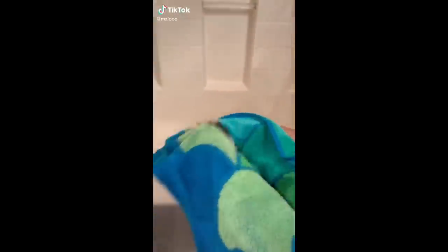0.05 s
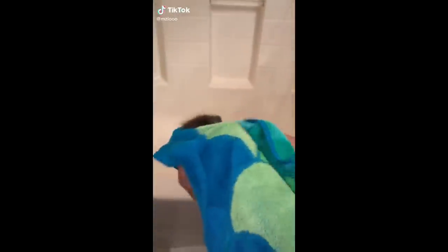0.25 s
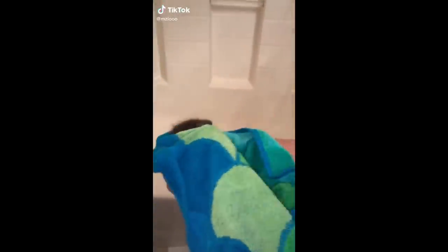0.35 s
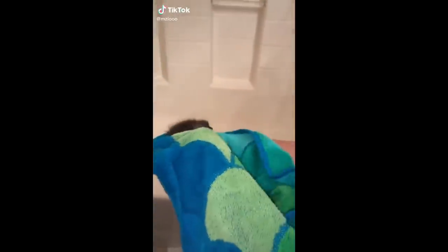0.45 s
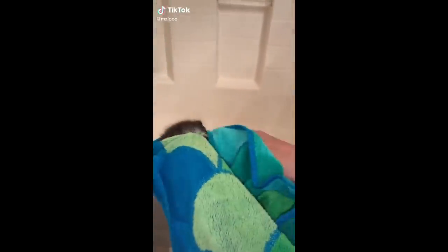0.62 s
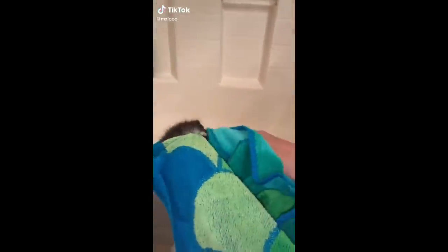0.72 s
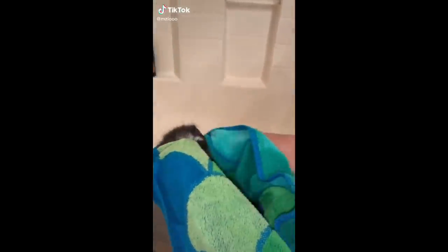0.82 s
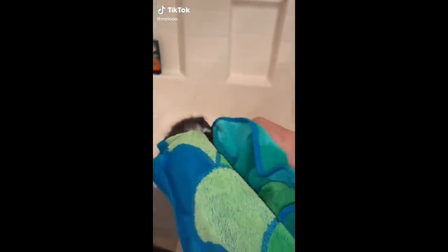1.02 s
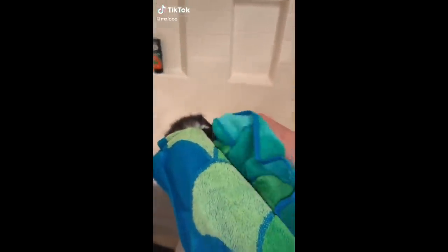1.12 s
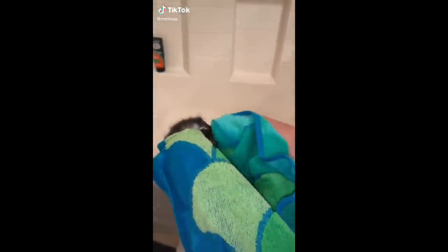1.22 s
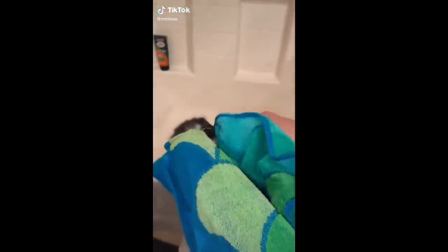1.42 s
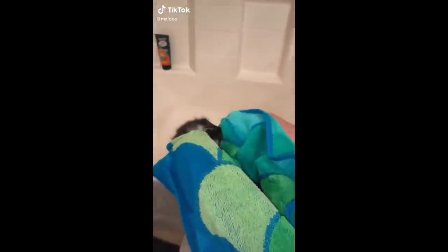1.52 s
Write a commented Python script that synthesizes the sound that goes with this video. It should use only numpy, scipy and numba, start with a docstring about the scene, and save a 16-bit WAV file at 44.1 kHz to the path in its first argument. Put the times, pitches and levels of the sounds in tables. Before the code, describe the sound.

A young raccoon cries out twice, close up: a creaky rasp narrowing to a wavering squeal, then a long fluttering snarl. Towel rubbing and dull bumps lie beneath, in a small, hard, ringing bathroom.

```python
"""A young raccoon protests while it is rubbed dry in a towel over a bathtub.
Uneven throat pulses and puffs of noise, shaped by resonances, make its voice. The first cry creaks open
into a harsh rasp and narrows to a rough squeal, a wavering tone; the second is a long, fluttering snarl.
Coloured noise makes the towel's rubbing, and short low tones its dull bumps.
The small hard room rings behind a close pair of microphones."""
import sys
import numpy as np
from scipy import signal
from scipy.fft import rfft, irfft, next_fast_len
from scipy.io import wavfile
from scipy.ndimage import uniform_filter1d
from numba import njit

SR = 44100
rng = np.random.default_rng(int(sys.argv[2]) if len(sys.argv) > 2 else 0)


def master(y):
    """Save y as 16-bit WAV."""
    cut = np.clip(np.atleast_2d(y).T, -1, 1)
    pcm = np.round(cut * 32767)  # scale
    wavfile.write(sys.argv[1], SR, pcm.astype(np.int16))


N = 68355
TIME = np.arange(N) / SR


def from_db(db):
    """Turns decibels into a plain amplitude factor."""
    return 10 ** (np.asarray(db) / 20)


def rms_one(x):
    """Scales a sound to an average strength (rms) of 1."""
    return x / np.sqrt(np.mean(x ** 2) + 1e-20)


def in_time(rows):
    """Draws each column of a table as a curve, sample by sample."""
    s, *columns = np.transpose(rows)
    return [np.interp(TIME, s, c) for c in columns]


def during(rows, fade_s):
    """One while a table's curve lasts, fading to zero outside it."""
    inside_s = np.minimum(TIME - rows[0][0], rows[-1][0] - TIME)
    return np.clip(inside_s / fade_s + 1, 0, 1)


def white_noise():
    """A fresh stretch of plain noise, equally strong at every pitch."""
    return rng.standard_normal(N)


def drift(rate_hz):
    """Slow random wandering with spread 1: noise smoothed twice."""
    r = np.exp(-2 * np.pi * rate_hz / SR)
    wander = signal.lfilter([1], [1, -2 * r, r * r], rng.standard_normal(2 * N))
    return rms_one(wander[N:])  # the first half only settles the filter


def coloured(spectrum):
    """Noise with a given balance of low and high, rms 1."""
    hz, db = np.transpose(spectrum)
    bins = np.linspace(1, SR / 2, N // 2 + 1)
    colour = from_db(np.interp(np.log(bins), np.log(hz), db))
    return rms_one(irfft(rfft(white_noise()) * colour, N))


def evened(x, window_s):
    """Holds the running rms near 1 and leaves faster grain alone."""
    size = max(int(window_s * SR), 2)
    power = uniform_filter1d(uniform_filter1d(x * x, size), size)
    return x / np.sqrt(np.abs(power) + 1e-12)


@njit
def resonate(x, angle, r):
    """A movable resonance that rings at one pitch, with gain close to 1 at its top."""
    y = np.zeros(len(x))
    for i in range(2, len(x)):
        fed = (1 - r * r) / 2 * (x[i] - x[i - 2])
        y[i] = fed + 2 * r * np.cos(angle[i]) * y[i - 1] - r * r * y[i - 2]
    return y


def cavity(source, table, shift=1):
    """Side-by-side resonances, each run twice to steepen it and fed by its own call of the source."""
    out = 0
    for hz, width, db in table:
        angle = 2 * np.pi * hz * shift / SR * np.ones(N)
        r = np.exp(-np.pi * width / SR)
        out = out + from_db(db) * resonate(resonate(source(), angle, r), angle, r)
    return out


def larynx(pitch_hz, jitter, shimmer_db, puff_s, leak, limp_db=0):
    """Uneven throat pulses that let out puffs of noise; returns a source for any noise share (0-1)."""
    cycles = np.floor(np.cumsum(pitch_hz * np.exp(jitter * drift(120))) / SR)
    # a limp makes every other pulse stronger
    strength_db = shimmer_db * drift(93) + limp_db * (cycles % 2)
    pulses = np.diff(cycles, prepend=0) * from_db(strength_db)
    decay = np.exp(-1 / (puff_s * SR))
    puffs = rms_one(signal.lfilter([1], [1, -decay], pulses + 1e-18)) + leak

    def source(rough):
        breath = rms_one(puffs * white_noise())
        return np.sqrt(1 - rough) * rms_one(pulses) + np.sqrt(rough) * breath
    return source


# towel rubbing: start_s, level_db (wavers around this)
RUB_LEVEL = [(0, -40.5), (.04, -46.5), (.075, -39), (.1, -43), (.125, -51.5), (.18, -62), (.25, -39),
             (1.0, -38.5), (1.3, -55), (1.55, -67.5)]
# its colour, low to high: pitch_hz, level_db per Hz (relative)
RUB_COLOUR = [(100, -47), (220, 1.5), (420, 2.5), (700, -2), (1300, 2.5), (2000, 7), (2800, -5),
              (4000, -19), (7000, -21), (15000, -45.5)]


def rubbing():
    """Cloth rubbing: coloured noise with a quick random waver that gives it grain."""
    level_db = in_time(RUB_LEVEL)[0] + 1.54 * drift(160)
    return from_db(level_db) * coloured(RUB_COLOUR)


# murmur of the tub under the handling: start_s, level_db
HOLLOW_LEVEL = [(0, -65), (.17, -55), (.22, -33.5), (.4, -45.5), (.75, -54), (1.0, -55), (1.2, -81),
                (1.55, -57.5)]
# resonances of the tub: pitch_hz, width_hz (of each pass), level_db (relative)
TUB_RESONANCES = [(244, 80, 1.5), (328, 87, 4.5), (441, 180, -1.5)]


def hollow_tub():
    """The tub's hollow answer: noise ringing in a few low resonances."""
    murmur = evened(cavity(white_noise, TUB_RESONANCES), window_s=0.3)
    return from_db(in_time(HOLLOW_LEVEL)[0]) * murmur


# brief drag of the bundle: start_s, level_db
DRAG_LEVEL = [(.03, -54), (.055, -44), (.074, -37.5), (.105, -33), (.118, -41), (.135, -64), (.15, -90)]
# resonances of the drag: pitch_hz, width_hz (of each pass), level_db (relative)
DRAG_BODY = [(341, 64, -0.5), (407, 83, -17)]
# dull bumps of the bundle in the tub: centre_s, pitch_hz, level_db, spread_s
BUMPS = [(0.561, 352, -33, 0.0039), (0.591, 339, -41.5, 0.0049), (0.649, 252, -39, 0.0098),
         (0.721, 347, -29.5, 0.0056), (0.847, 320, -37, 0.0034), (1.025, 342, -43.5, 0.0078)]


def handling():
    """A low drag of resonant noise, and bumps: low tones that swell and fade in a bell shape."""
    drag = from_db(in_time(DRAG_LEVEL)[0]) * evened(cavity(white_noise, DRAG_BODY), window_s=0.01)
    bumps = 0
    for s, hz, db, spread in BUMPS:
        swell = np.exp(-.5 * ((TIME - s) / spread) ** 2)
        bumps = bumps + from_db(db) * np.sqrt(2) * swell * np.sin(2 * np.pi * hz * (TIME - s))
    return drag + bumps


# creaks that open the first cry: start_s, peak_level_db
CREAKS = [(.189, -46), (.196, -37), (.205, -31), (.2135, -23), (.2245, -23)]
# resonances of the creaks: pitch_hz, width_hz (of each pass), level_db (relative)
CREAK_THROAT = [(350, 220, -9), (1250, 500, -3), (2250, 600, 0), (4000, 900, -26), (10200, 900, -32)]


def creak():
    """The folds part a few times before the first cry catches; each puff swells and dies."""
    swell_s = .0012
    puffs = 0
    for s, db in CREAKS:
        age = np.maximum(TIME - s, 0) / swell_s
        puffs = puffs + from_db(db) * age * np.exp(1 - age)
    return puffs * evened(cavity(white_noise, CREAK_THROAT), window_s=.003)


# level of the low growl: start_s, level_db
GROWL_LEVEL = [(.19, -58), (.22, -42), (.25, -37), (.33, -40), (.42, -38), (.445, -44), (.465, -68)]
# its pitch: start_s, pitch_hz (wavers around this)
GROWL_PITCH = [(.2, 225), (.26, 260), (.31, 275), (.37, 258), (.45, 238)]


def growl():
    """The low fundamental of the first cry: a plain tone with a shaky pitch."""
    pitch_hz = in_time(GROWL_PITCH)[0] * (1 + .04 * drift(60))
    tone = rms_one(np.sin(2 * np.pi * np.cumsum(pitch_hz) / SR))
    return from_db(in_time(GROWL_LEVEL)[0]) * tone


# upper mouth resonance: start_s, pitch_hz (times .98), level_db (against the lower one)
UPPER_MOUTH = [(.19, 2510, 1.5), (.26, 2250, 2), (.31, 1984, 4), (.36, 1940, -9.5), (.44, 2000, -19),
               (.55, 1890, -15.5), (.6, 1920, -23.5), (.63, 1900, 1.5), (.67, 2112, 10.5)]
# high resonance, louder as the mouth opens: pitch_hz, width_hz (of each pass), level_db (mouth widest)
CRY_HIGH = [(3670, 810, -11.5)]
# steady throat resonances: pitch_hz, width_hz (of each pass), level_db (relative)
CRY_THROAT = [(450, 450, -18), (950, 250, -19), (1400, 450, -8), (2620, 380, -15)]


def cry_rasp(voiced, airy, mouth_hz):
    """Throat pulses and breath ringing in a mouth whose resonances move."""
    upper_hz, upper_db = in_time(UPPER_MOUTH)
    # here the first number is a share of the moving pitch
    lower = cavity(voiced, [(0.85, 590, 0.009)], mouth_hz)
    upper = from_db(upper_db) * cavity(voiced, [(0.98, 414, 0.016)], upper_hz)
    opening_db = 10 * np.log2(mouth_hz / mouth_hz.max())  # 10 dB per octave
    high = from_db(opening_db) * cavity(airy, CRY_HIGH)
    return evened(lower + upper + high + cavity(airy, CRY_THROAT), window_s=.01)


# treble resonances: pitch_hz, width_hz (of each pass), level_db (relative)
CRY_TREBLE = [(6580, 2570, 16), (7420, 1180, -28.5)]
# level of the highest hiss: start_s, level_db (against the treble)
SIZZLE_LEVEL = [(.19, 19.5), (.24, 14.5), (.3, -6.5), (.38, 0.5), (.43, -52), (.56, -25), (.6, -1),
                (.67, -5)]
# resonances of that hiss: pitch_hz, width_hz (of each pass), level_db (relative)
CRY_SIZZLE = [(9020, 970, -30.5), (10050, 900, 3.5), (13500, 2200, -10.5)]


def cry_treble(airy):
    """Breathy hiss: rough breath in high resonances, with a separate sizzle on top."""
    edge = signal.butter(8, 7400, fs=SR, output="sos")  # Hz; keeps this part below the sizzle
    hiss = signal.sosfilt(edge, cavity(airy, CRY_TREBLE))
    sizzle = from_db(in_time(SIZZLE_LEVEL)[0]) * cavity(airy, CRY_SIZZLE)
    return evened(hiss + sizzle, window_s=0.005)


# throbbing of the squeal: start_s, rate_hz, depth_db (before evening)
THROB = [(.36, 150, 3), (.42, 150, 5), (.455, 150, 5), (.468, 120, 1), (.5, 120, 1), (.52, 130, 3),
         (.54, 130, 1), (.56, 130, 4), (.578, 120, 1), (.62, 150, 2), (.66, 200, 4)]


def squeal(pitch_hz, jitter, shimmer_db, octave_db):
    """A high, nearly pure but unsteady vibration of the folds that throbs in loudness."""
    phase = 2 * np.pi * np.cumsum(pitch_hz * (1 + jitter * drift(180))) / SR
    tone = np.sin(phase) + from_db(octave_db) * np.sin(2 * phase)
    tone = evened(from_db(shimmer_db * drift(90)) * tone, window_s=0.018)
    throb_hz, throb_db = in_time(THROB)
    throb = np.cos(2 * np.pi * np.cumsum(throb_hz) / SR)
    return evened(tone * from_db(throb_db * throb), window_s=.014)


# first cry: start_s, level_db (before the voice gains), mouth_hz (times .85), treble_db (before its gain)
CRY = [(0.19, -48, 2120, -84), (0.212, -32.5, 2220, -58), (0.236, -19, 2220, -46.5),
       (0.275, -19, 2090, -35), (0.29, -15, 2050, -32.5), (0.314, -16.5, 2000, -31.5),
       (0.346, -22.5, 1670, -38), (0.374, -22, 1350, -41.5), (0.4, -21.5, 1400, -40),
       (0.415, -29, 1370, -48.5), (0.458, -23, 1240, -43.5), (0.476, -25, 1230, -37),
       (0.489, -18.5, 1230, -48.5), (0.517, -26, 1230, -41.5), (0.533, -17, 1200, -47),
       (0.546, -27.5, 1170, -38.5), (0.553, -29.5, 1190, -44.5), (0.572, -27.5, 1200, -46.5),
       (0.578, -15, 1280, -40.5), (0.6, -12, 1430, -40), (0.62, -15.5, 1500, -33.5),
       (0.64, -20.5, 1544, -33), (0.655, -29.5, 1640, -42.5), (0.675, -35.5, 1710, -64.5)]
# its pulse rate: start_s, pitch_hz (jitters around this)
CRY_PITCH = [(.19, 201.8), (.22, 220.3), (.245, 264.1), (.29, 301.2), (.33, 270.7), (.45, 238.3),
             (.67, 248.5)]
# the squeal within it: start_s, pitch_hz (jitters around this), share of the voice's power 0-1
SQUEAL = [(.36, 1400, 0), (.372, 1310, .7), (.388, 1290, .6), (.401, 1450, .7), (.411, 1260, .6),
          (.424, 1380, .8), (.445, 1300, .85), (.455, 1190, .8), (.466, 1290, .85), (.474, 1160, .94),
          (.484, 1220, .96), (.492, 1315, .97), (.514, 1300, .95), (.522, 1190, .9), (.535, 1255, .96),
          (.548, 1260, .95), (.556, 1160, .85), (.57, 1220, .75), (.576, 1270, .96), (.583, 1300, .96),
          (.592, 1220, .92), (.602, 1400, .97), (.611, 1410, .92), (.617, 1320, .7), (.635, 1390, .35),
          (.66, 1400, .02)]
# the squeal catches for an instant: centre_s, loss_db
CATCHES = [(.479, 10), (.523, 9), (.5838, 17), (.592, 15), (.6135, 11)]
CATCH_SPREAD_S = .0018
CRY_DB, SQUEAL_DB, CRY_TREBLE_DB = 1, -1.5, 2.5  # gains of rasp, squeal and treble


def first_cry():
    """A pulsing rasp through a closing mouth, which breaks into a throbbing squeal and opens again."""
    level_db, mouth_hz, treble_db = in_time(CRY)
    for s, db in CATCHES:
        level_db = level_db - db * np.exp(-.5 * ((TIME - s) / CATCH_SPREAD_S) ** 2)
    squeal_hz, share = in_time(SQUEAL)
    pitch_hz, = in_time(CRY_PITCH)
    source = larynx(pitch_hz, jitter=.12, shimmer_db=2, puff_s=.0015, leak=.3, limp_db=2)
    voiced, airy = lambda: source(.4), lambda: source(.93)
    rasp = from_db(CRY_DB) * cry_rasp(voiced, airy, mouth_hz)
    tone = from_db(SQUEAL_DB) * squeal(squeal_hz, jitter=.013, shimmer_db=1.3, octave_db=-17.5)
    voice = np.sqrt(1 - share) * rasp + np.sqrt(share) * tone
    treble = from_db(treble_db + CRY_TREBLE_DB) * cry_treble(airy)
    return (from_db(level_db) * voice + treble + growl()) * during(CRY, fade_s=0.0033)


# lowest resonance of the snarl: pitch_hz (before the shifts), width_hz (of each pass), level_db (relative)
SNARL_LOW = [(1198, 200, -7.5)]
# slow shift of the lowest one: start_s, pitch factor
LOW_SHIFT = [(.68, 1.05), (.9, 1.116), (1.1, 1.052), (1.28, 1.055)]
# middle resonances: pitch_hz (before the shifts), width_hz (of each pass), level_db (relative)
SNARL_THROAT = [(653, 2470, -23.5), (1810, 160, -9.5), (2071, 382, 1), (2468, 277, -6.5), (2810, 500, -19)]
# the jaw opens towards the end and lifts the middle ones: start_s, pitch factor
JAW = [(.68, 0.986), (.8, 1.021), (.9, 1.002), (1.03, 0.99), (1.12, 1.012), (1.2, 1.093), (1.28, 1.065)]
# upper resonance: pitch_hz (before the arch), width_hz (of each pass), level_db (relative)
SNARL_HIGH = [(4081, 246, -2)]
# closing of the lips damps the upper one: start_s, level_db
HIGH_OPEN = [(.68, -4.5), (.8, -6), (1.03, -3.5), (1.12, 1.5), (1.2, -7.5), (1.29, -24.5)]
# the snarl narrows to one ringing resonance: start_s, share of the voice's power 0-1
RING_SHARE = [(.68, 0), (.95, 0), (.985, .4), (1.02, .5), (1.045, .8), (1.06, .45), (1.09, .1), (1.2, 0)]
# that resonance: pitch_hz, width_hz (of each pass), level_db
RING_THROAT = [(2099, 150, 0)]
JAW_SWING_DB = 7.5  # scales how the beat swings the lowest resonance's loudness


def snarl_voice(voiced, airy, beat, arch):
    """Throat resonances that rise and fall with each flutter beat and briefly narrow to one ring."""
    low = cavity(voiced, SNARL_LOW, in_time(LOW_SHIFT)[0] + arch)
    low = from_db(JAW_SWING_DB * beat) * low
    middle = cavity(voiced, SNARL_THROAT, in_time(JAW)[0] + arch * 2 / 3)
    high = from_db(in_time(HIGH_OPEN)[0]) * cavity(airy, SNARL_HIGH, 1 + arch / 3)
    share, = in_time(RING_SHARE)
    open_voice = evened(low + middle + high, window_s=.005)
    ring = evened(cavity(voiced, RING_THROAT), window_s=.005)
    return np.sqrt(1 - share) * open_voice + np.sqrt(share) * ring


# second cry: start_s, level_db (before its gain), treble_db (before its gain)
SNARL = [(0.675, -38.5, -46.5), (0.701, -12, -29.5), (0.741, -23.5, -36), (0.749, -36, -50),
         (0.767, -16, -25.5), (0.8, -17.5, -32.5), (0.881, -21, -33.5), (1.025, -22, -35),
         (1.055, -32.5, -56.5), (1.061, -26, -37.5), (1.127, -20, -31.5), (1.14, -26.5, -38.5),
         (1.17, -22, -33), (1.191, -19, -33), (1.197, -25.5, -42), (1.245, -22.5, -35.5),
         (1.279, -22.5, -37.5), (1.295, -26.5, -47)]
# its flutter: start_s, depth_db (times the beat, before evening; half for the treble)
FLUTTER = [(.68, 1.5), (.82, 2.2), (.86, 5.5), (1.05, 4.8), (1.19, 5), (1.29, 3.6)]
# treble resonances: pitch_hz (before the lips shift it), width_hz (of each pass), level_db (relative)
SNARL_TREBLE = [(5460, 530, -1.5), (6970, 1460, 1.5), (8750, 1340, -1.5), (9500, 720, -25),
                (13450, 2300, -21)]
# the lips draw back and move the treble resonances: start_s, pitch factor
LIPS = [(.68, 0.99), (.8, 0.99), (.98, 0.99), (1.12, 1.01), (1.28, 1.133)]
SNARL_DB, SNARL_TREBLE_DB = 1.5, 4  # gains of voice and treble
FLUTTER_HZ, FLUTTER_CREST_S = 46.4, .8455  # rate, and the middle of one loud beat
FLUTTER_SNAP = .3  # flattens the crests and sharpens the dips
BEAT_SWEEP, SWEEP_LAG = .14, 1.1  # resonance shift as a pitch factor, and its delay in radians


def snarl():
    """An open-mouthed rasp, chopped by soft tissue in the throat; the resonances arch in each beat."""
    level_db, treble_db = in_time(SNARL)
    depth_db, = in_time(FLUTTER)
    phase = 2 * np.pi * FLUTTER_HZ * (TIME - FLUTTER_CREST_S)
    beat = np.cos(phase) - FLUTTER_SNAP * np.cos(2 * phase)
    arch = BEAT_SWEEP * np.cos(phase - SWEEP_LAG)
    source = larynx(257.6, jitter=.14, shimmer_db=2.5, puff_s=.0018, leak=.35)
    voiced, airy = lambda: source(.4), lambda: source(.97)
    voice = snarl_voice(voiced, airy, beat, arch)
    voice = evened(voice * from_db(depth_db * beat), window_s=.03)
    treble = evened(cavity(airy, SNARL_TREBLE, in_time(LIPS)[0]), window_s=0.006)
    treble = evened(treble * from_db(.5 * depth_db * beat), window_s=0.039)
    both = from_db(level_db + SNARL_DB) * voice + from_db(treble_db + SNARL_TREBLE_DB) * treble
    return both * during(SNARL, fade_s=0.00507)


ROOM_DB, ROOM_LIKENESS = -6.5, .4  # tail level, and how alike the two sides stay at high pitch (0-1)
ROOM_T60_S, ROOM_DAMPING_HZ = 0.35, 19000  # time to fade 60 dB at low pitch; halved at the damping pitch
ROOM_GAP_S = 0.001  # silence before the tail


def dense_tail(t):
    """Countless echoes off hard walls: fading noise, dying sooner at high pitch, alike in the bass."""
    bins = np.fft.rfftfreq(len(t), 1 / SR)
    shared = rfft(rng.standard_normal(len(t)))
    own = rfft(rng.standard_normal((2, len(t))))
    alike = ROOM_LIKENESS + (1 - ROOM_LIKENESS) / (1 + (bins / 700) ** 2)
    white = np.sqrt(alike) * shared + np.sqrt(1 - alike) * own
    edges, tail = np.geomspace(150, 16000, 8), 0
    for low, high in zip(edges, edges[1:]):
        t60 = ROOM_T60_S / (1 + np.sqrt(low * high) / ROOM_DAMPING_HZ)
        band = irfft(white * ((bins >= low) & (bins < high)), len(t))
        tail = tail + band * from_db(-60 * t / t60)
    tail = tail * (t > ROOM_GAP_S)
    middle = (bins > edges[2]) & (bins < edges[5])
    gain = np.sqrt(np.mean(np.abs(rfft(tail)[:, middle]) ** 2))
    return from_db(ROOM_DB) * tail / gain


# standing waves between the hard walls: pitch_hz, level_db (before MODE_DB)
ROOM_MODES = [(249, -1), (565, -4), (667, 9), (829, -1), (947, 0), (990, 0), (1120, -5), (1240, -4),
              (1303, -3), (1443, -1), (1734, 1), (1895, -5), (1966, -5), (2039, -1), (2089, -7), (2164, -2),
              (2246, 0), (2477, -1), (2681, -3), (3525, -3)]
MODE_DB = -4
MODE_T60_S, MODE_T60_SLOPE = .47, -.15  # time to fade 60 dB at 1000 Hz, and its power law over pitch


def standing_waves(t):
    """A few pitches that fit between the walls and ring on as fading tones."""
    standing = 0
    for hz, db in ROOM_MODES:
        t60 = MODE_T60_S * (hz / 1000) ** MODE_T60_SLOPE
        fade = from_db(-60 * t / t60)
        standing = standing + from_db(db + MODE_DB) * np.cos(2 * np.pi * hz * t) * 2 * fade / fade.sum()
    return standing


def bathroom(x):
    """The room's answer at both microphones: a dense tail plus a few standing waves."""
    t = TIME[:SR // 2]
    return signal.fftconvolve(x[None], dense_tail(t) + standing_waves(t), axes=1)[:, :N]


# how far the left microphone leads (below zero, the right leads): pitch_hz, lead in radians
PORT_PHASE = [(0, 0), (700, -.3), (2000, .9), (3400, 1.3), (4800, 3.2), (6400, 5.8), (7300, 6.6),
              (8900, 9.4), (10400, 12.2), (11700, 13), (12800, 15.7), (14600, 18.8)]
# left microphone against the right: pitch_hz, level_db
PORT_BALANCE = [(300, .3), (600, -.7), (2200, -.8), (4200, 0)]


def ports(pair):
    """Two microphones: the timing and loudness between left and right change with pitch."""
    size = next_fast_len(N + SR // 10)
    bins = np.fft.rfftfreq(size, 1 / SR)
    lead = np.interp(bins, *np.transpose(PORT_PHASE))
    balance_db = np.interp(bins, *np.transpose(PORT_BALANCE))
    sides = np.array([[.5], [-.5]])  # half the difference to each side
    turned = rfft(pair, size) * np.exp(1j * lead * sides)
    return irfft(turned * from_db(balance_db * sides), size)[:, :N]


# colour of the steady background noise: pitch_hz, level_db per Hz (relative)
FLOOR_COLOUR = [(20, -41), (60, 9), (110, -9.5), (250, 3), (700, -2.5), (2000, -48), (5000, -53.5),
                (15000, -37)]
FLOOR_DB = -60.5  # level of the shared part


def background():
    """Steady faint noise, mostly shared by both sides, with a weaker part of opposite sign."""
    opposite = from_db(-10) * coloured(FLOOR_COLOUR) * np.array([[1], [-1]])
    return from_db(FLOOR_DB) * (coloured(FLOOR_COLOUR) + opposite)


def scene():
    """Adds up the sounds; the drag and bumps are too close to stir the room."""
    near = rubbing() + hollow_tub() + creak() + first_cry() + snarl()
    pair = ports(near + bathroom(near) + handling()) * from_db(-3.0)
    return pair + background()


def record(dry):
    """Thins the deep bass below about 35 Hz and cuts the top above 15300 Hz."""
    thin = signal.sosfilt(signal.butter(2, 35, "high", fs=SR, output="sos"), dry)
    return signal.sosfilt(signal.ellip(10, .2, 80, 15300, fs=SR, output="sos"), thin)


dry = scene()
out = record(dry)
master(out)
```